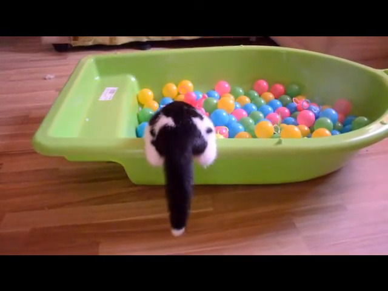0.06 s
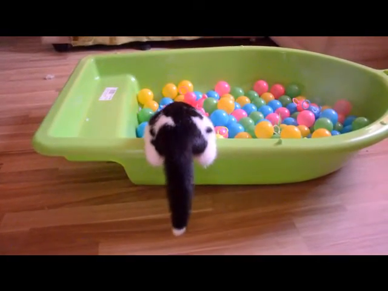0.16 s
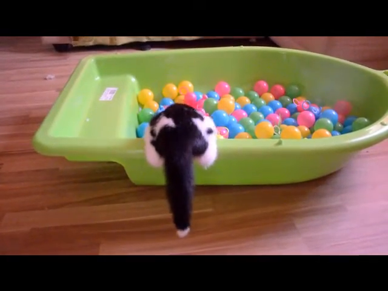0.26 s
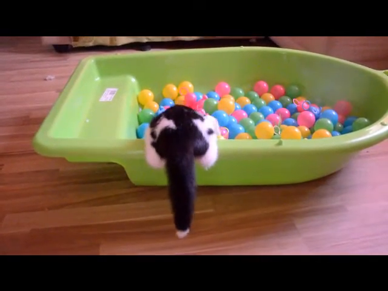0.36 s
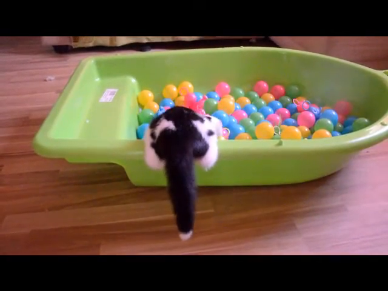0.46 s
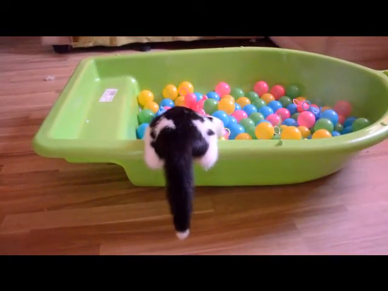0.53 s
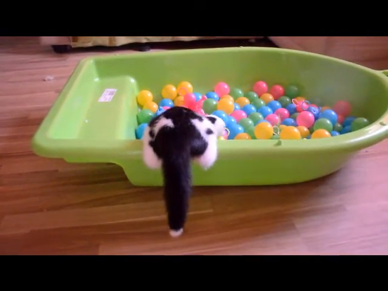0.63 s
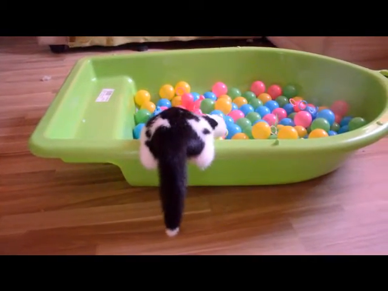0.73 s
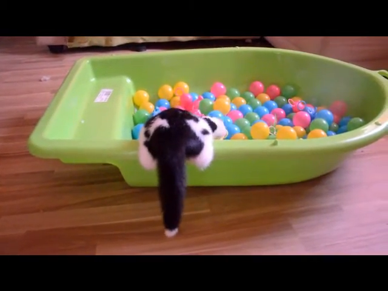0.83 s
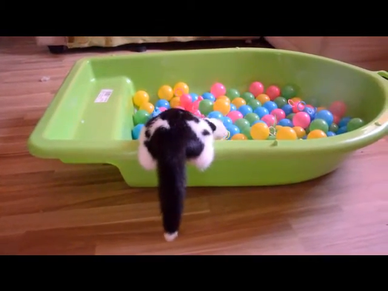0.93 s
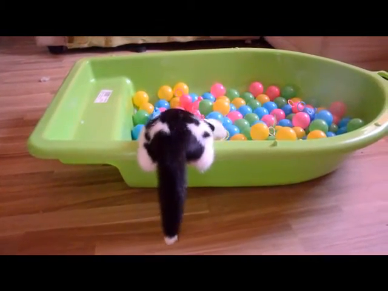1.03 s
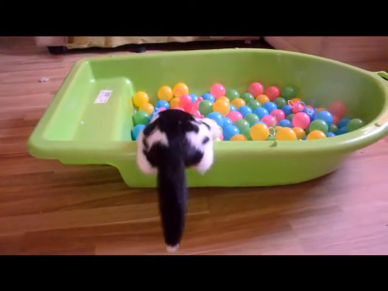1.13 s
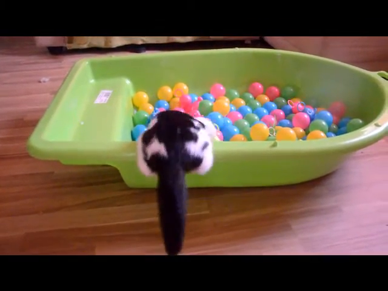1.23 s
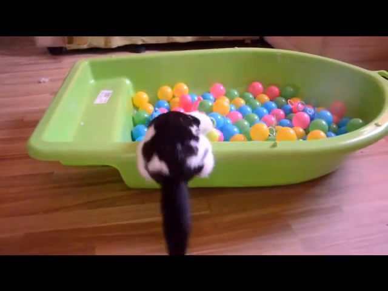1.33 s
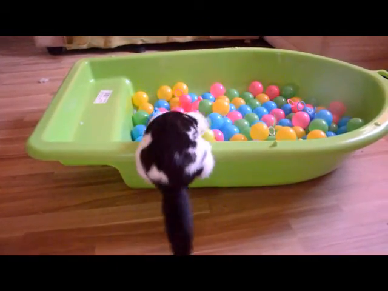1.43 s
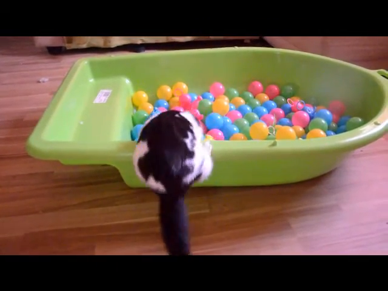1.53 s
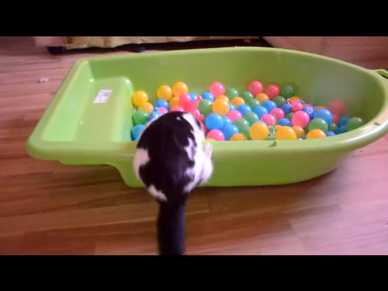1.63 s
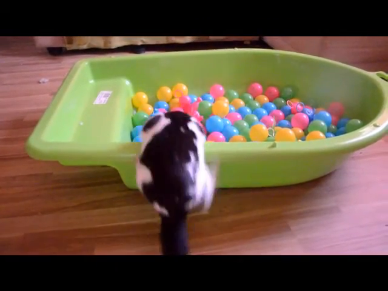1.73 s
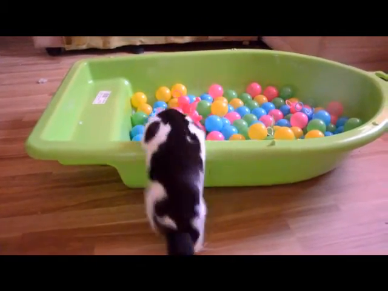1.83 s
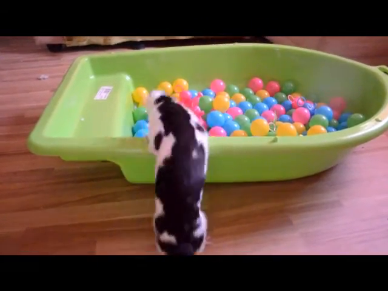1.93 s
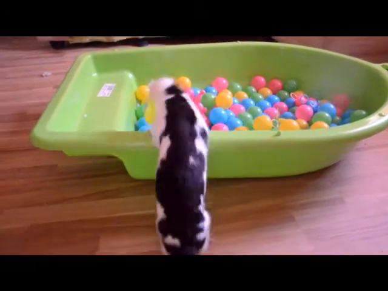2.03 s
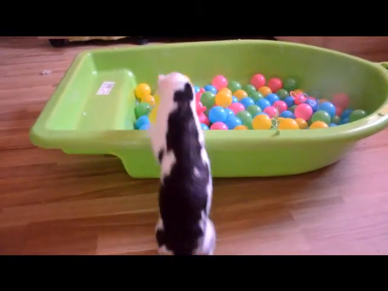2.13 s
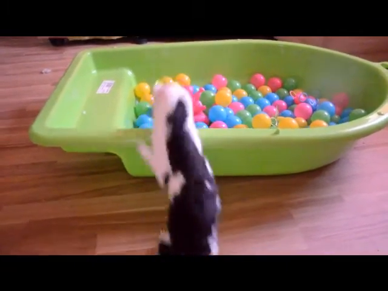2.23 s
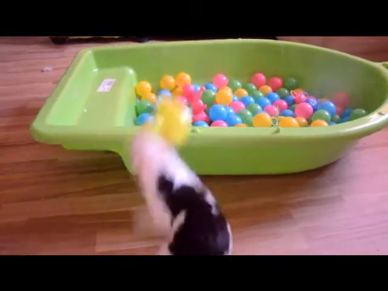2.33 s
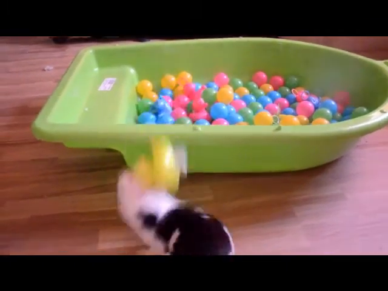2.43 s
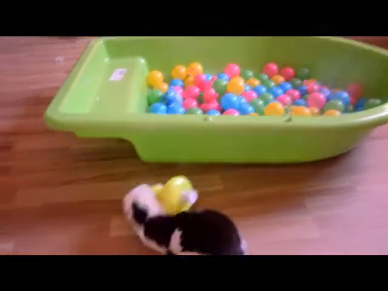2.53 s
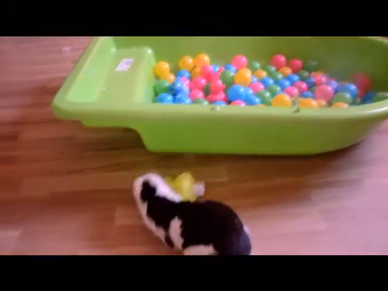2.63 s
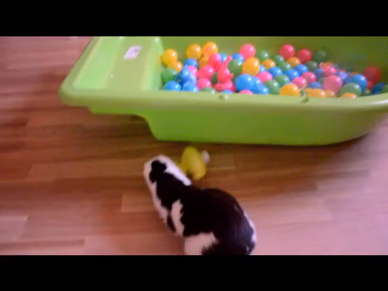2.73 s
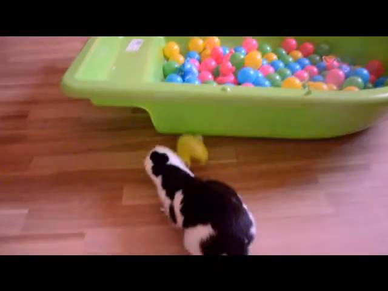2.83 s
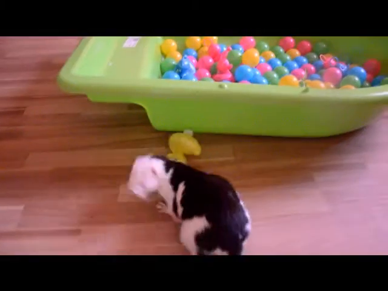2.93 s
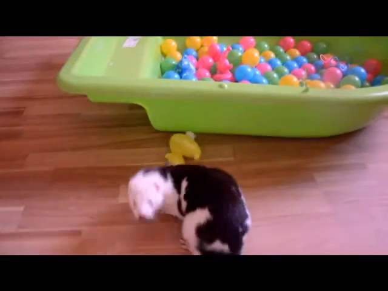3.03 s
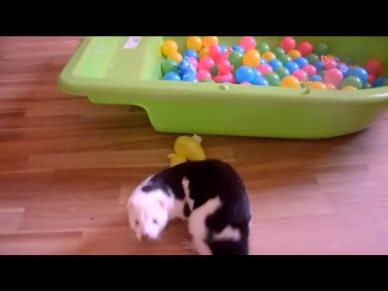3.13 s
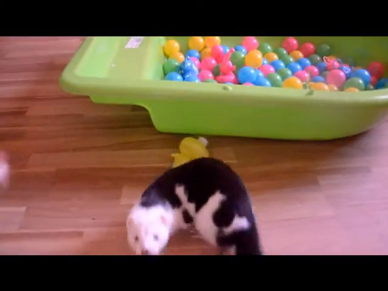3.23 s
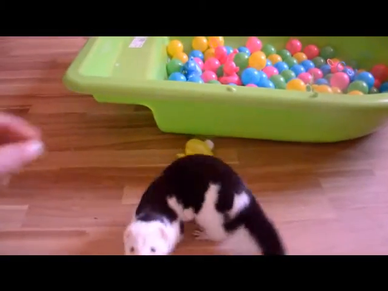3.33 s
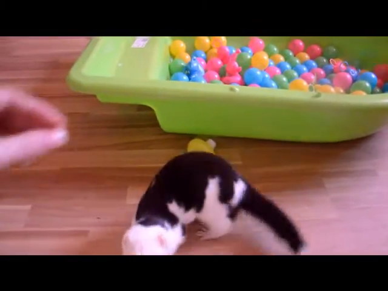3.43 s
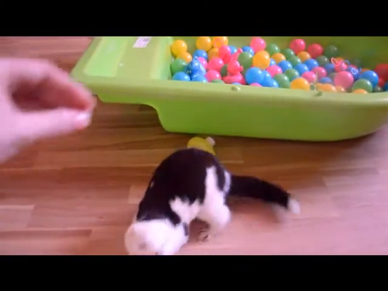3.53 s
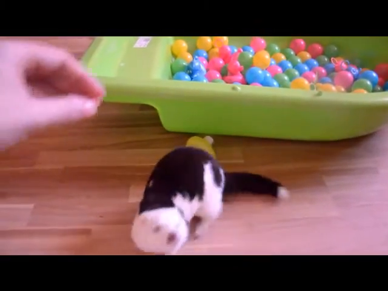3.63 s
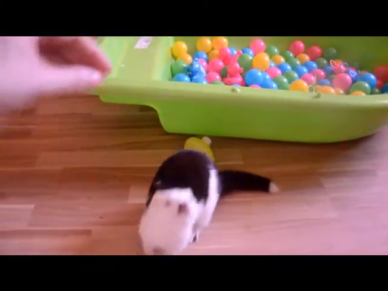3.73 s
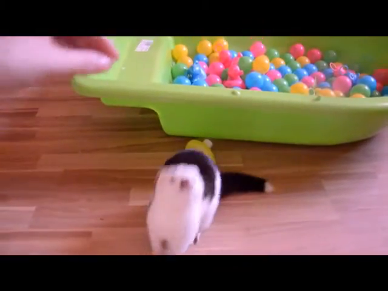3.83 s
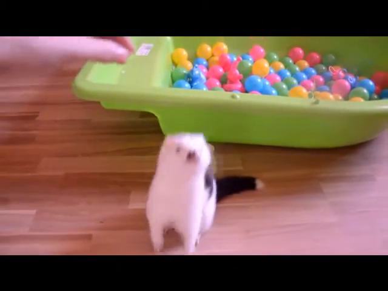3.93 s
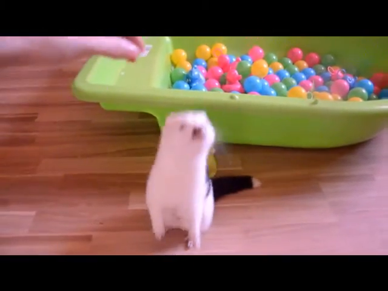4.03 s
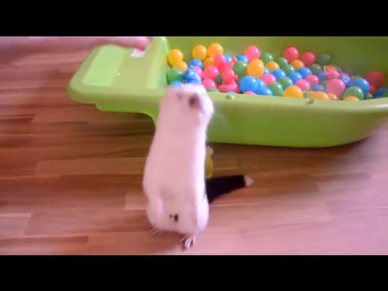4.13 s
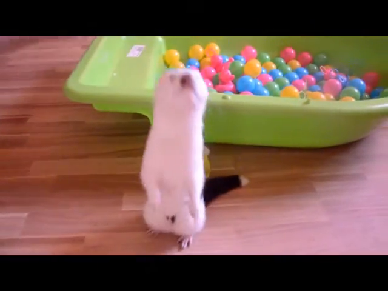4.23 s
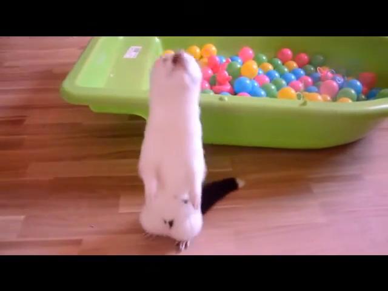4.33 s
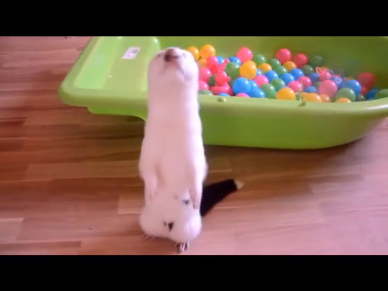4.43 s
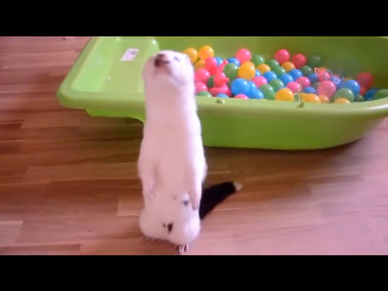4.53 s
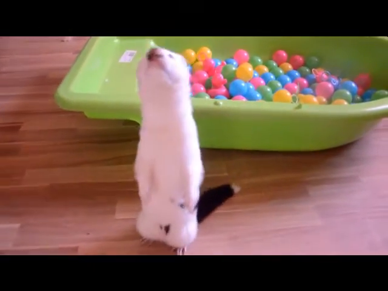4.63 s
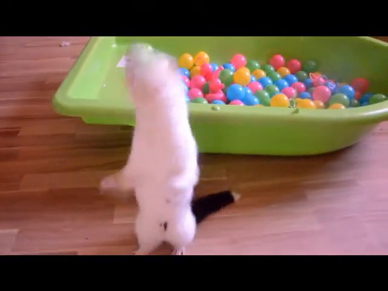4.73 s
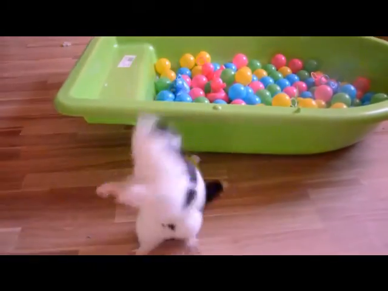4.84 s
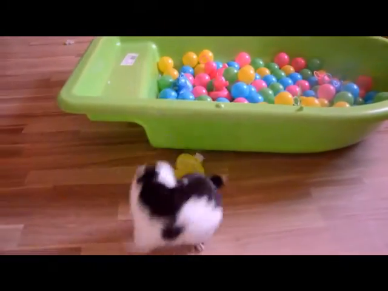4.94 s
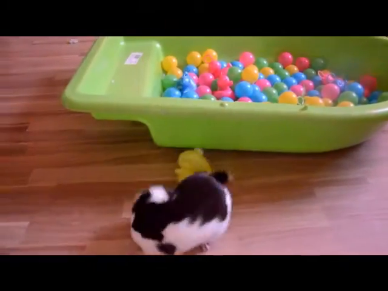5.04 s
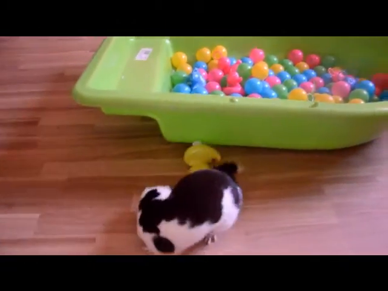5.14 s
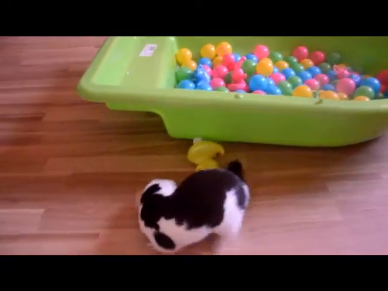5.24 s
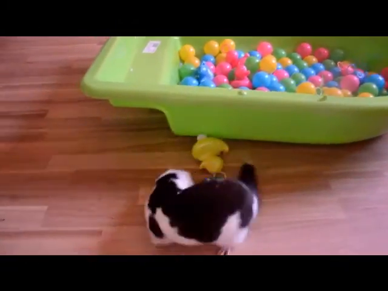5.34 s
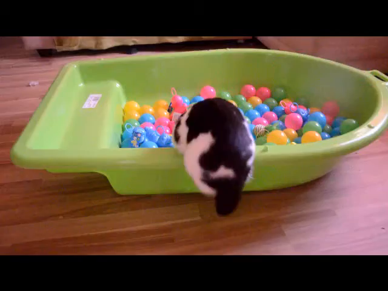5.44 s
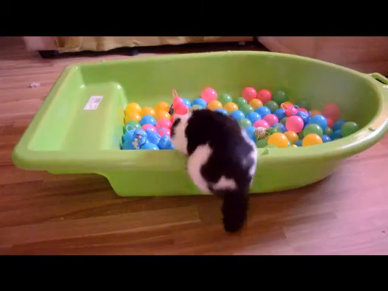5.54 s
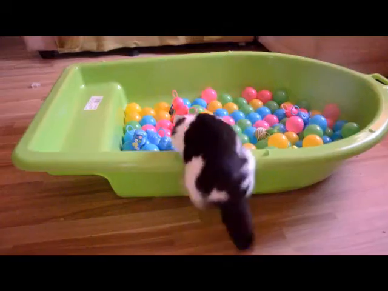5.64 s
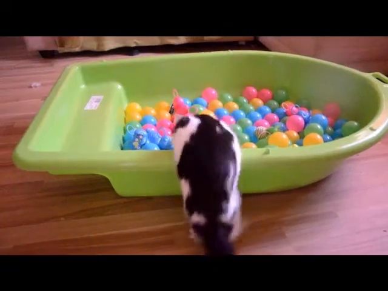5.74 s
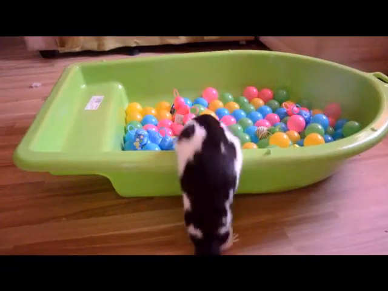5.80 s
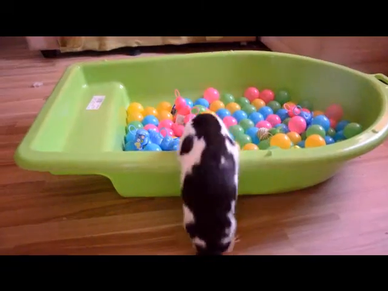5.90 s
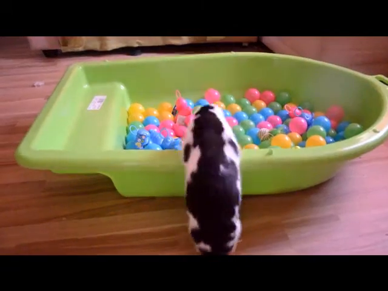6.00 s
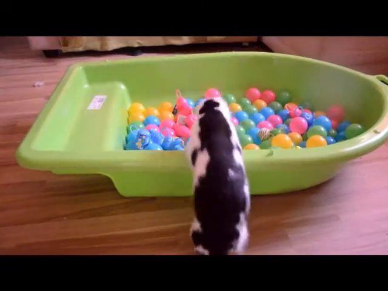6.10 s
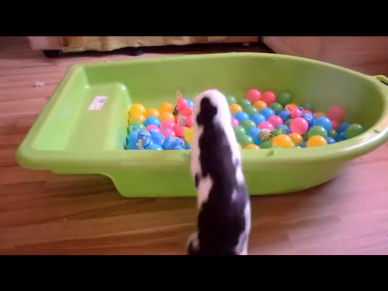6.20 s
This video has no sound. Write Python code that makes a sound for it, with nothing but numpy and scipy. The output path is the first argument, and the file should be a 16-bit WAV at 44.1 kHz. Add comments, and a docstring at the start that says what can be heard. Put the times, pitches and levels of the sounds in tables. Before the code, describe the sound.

A small animal roots among plastic balls, bumps the tub loudly, drops a bouncing toy on the floor, then digs in again.

```python
"""Hollow plastic balls rustle and knock over a faint appliance hum: a mink is rooting in a plastic baby tub.
The balls rub, squeak and hit the tub wall, and hard shoves rock the whole tub. The mink drags out a toy
that drops and bounces, making the laminate floor ring; the hardest blow overloads the microphone.
Toy and claws tick and paws scuff on the boards. The level dips briefly, then the mink digs into the balls
again while a faint high whistle sets in."""
import sys
import numpy as np
from scipy import signal
from scipy.fft import rfft, irfft, next_fast_len
from scipy.io import wavfile
from scipy.ndimage import uniform_filter1d

SR = 44100
rng = np.random.default_rng(int(sys.argv[2]) if len(sys.argv) > 2 else 0)


def master(y):
    """Save y as 16-bit WAV."""
    cut = np.clip(np.atleast_2d(y).T, -1, 1)
    pcm = np.round(cut * 32767)  # scale
    wavfile.write(sys.argv[1], SR, pcm.astype(np.int16))


N = 276374
TIME = np.arange(N) / SR
AGE = TIME[:SR // 2]   # seconds since a hit
BANDS_HZ = [(90, 550), (550, 1400), (1400, 4000), (4000, 14000)]   # thump, knock, clack, tick


def from_db(db):
    """Turn decibels into a gain."""
    return 10 ** (np.asarray(db) / 20)


def rms_one(x):
    """Scale a signal so that its average strength (rms) is 1."""
    return x / np.sqrt(np.mean(x ** 2) + 1e-20)


def at_level(sound, db):
    """Set the rms level of a sound's first 30 ms."""
    return from_db(db) * sound / np.sqrt(np.mean(sound[AGE < .03] ** 2))


def decay(t, t60):
    """A fade that falls by 60 dB in t60 seconds, the ring time."""
    return np.exp(-np.log(1000) * t / t60)


def add(out, s, sound):
    """Mix a sound in at s seconds."""
    start = int(np.clip(round(s * SR), 0, N - 1))
    out[start:start + len(sound)] += sound[:N - start]


def through(x, response):
    """Give a signal the ring or echoes of a response."""
    return signal.fftconvolve(x, response)[:len(x)]


def high_pass(x, hz):
    """Cut the lows: small or thin things give off little bass."""
    return signal.sosfilt(signal.butter(3, hz, "high", fs=SR, output="sos"), x)


def band_pass(x, edges_hz):
    """Keep what lies between two frequencies."""
    return signal.sosfilt(signal.butter(3, edges_hz, "band", fs=SR, output="sos"), x)


def pulse(spectrum, size=4096):
    """The shortest pulse with a given tone colour; its energy is 1."""
    hz, db = np.transpose(spectrum)
    grid_hz = np.maximum(np.fft.rfftfreq(size, 1 / SR), 1)
    gain = from_db(np.interp(np.log(grid_hz), np.log(hz), db))
    cepstrum = irfft(np.log(gain))
    cepstrum[1:size // 2] *= 2   # folding it in half packs the energy at the start
    cepstrum[size // 2:] = 0
    return rms_one(irfft(np.exp(rfft(cepstrum)))) / np.sqrt(size)


def narrow_noise(hz, width_hz):
    """Noise gathered around one pitch; its rms is 1."""
    size = next_fast_len(N, real=True)
    resonance = 1 / (1 + (2 * (np.fft.rfftfreq(size, 1 / SR) - hz) / width_hz) ** 2)
    return rms_one(irfft(rfft(rng.standard_normal(size)) * resonance, size)[:N])


def ring(tones, scatter_db=0, pitch=1, size=6000):
    """A struck object rings with its own tones; where it is hit can make each louder or softer."""
    hz, db, t60 = np.transpose(tones)[:, :, None]
    t = AGE[:size]
    strength = from_db(db + scatter_db * rng.uniform(-1, 1, hz.shape))
    sound = np.sum(strength * decay(t, t60) * np.sin(2 * np.pi * hz * pitch * t), axis=0)
    sound *= np.cos(np.pi / 2 * np.arange(size) / size)   # the ring fades smoothly to silence at its end
    return np.pad(rms_one(sound) / np.sqrt(size), (0, len(AGE) - size))


def reverb(t60_s=0.36, treble_t60_s=0.31, first_echo_s=0.0022, build_s=0.0084, lumpy_db=2.0):
    """The room's echoes build into a tail whose treble dies sooner; its energy is 1."""
    echoes = rng.standard_normal(len(AGE)) * from_db(lumpy_db * rng.uniform(-2.8, 2.2, len(AGE)))
    bass = signal.lfilter([.3], [1, -.7], echoes)
    tail = bass * decay(AGE, t60_s) + (echoes - bass) * decay(AGE, treble_t60_s)
    build_up = np.clip((AGE - first_echo_s) / build_s, 0, 1)
    return rms_one(tail * build_up) / np.sqrt(len(AGE))


def room(echo_db):
    """Direct sound and echoes from one spot in the room."""
    return (AGE == 0) + from_db(echo_db) * reverb()


def voiced(sound, levels_db, hard_hz=12000, db_per_octave=12.5):
    """How hard and where a blow lands sets the level of four bands; a soft blow is also duller."""
    _, _, clack_db, tick_db = levels_db
    dull_hz = np.clip(hard_hz * 2 ** ((tick_db - clack_db) / db_per_octave), 1800, 18000)
    sound = signal.sosfilt(signal.butter(2, dull_hz, fs=SR, output="sos"), sound)
    return sum(at_level(band_pass(sound, band), db) for band, db in zip(BANDS_HZ, levels_db))


def bouts(rows, rise_s, fall_s):
    """Gain of a repeated movement: each time it swells, holds and dies away."""
    gain = np.zeros(N)
    for s, length_s, db in rows:
        before, after = np.maximum(s - TIME, 0), np.maximum(TIME - s - length_s, 0)
        gain += from_db(db) * np.exp(-before / rise_s - after / fall_s)
    return gain


# tone colour of the room's air: f/Hz, relative level/dB
AIR_COLOUR = [(18, -53.5), (30, -14), (43, -4), (102, -2), (146, -5.5), (266, -3.5), (383, -8), (471, -1),
              (595, -4.5), (813, -7.5), (1400, -6), (1640, -9), (2130, -6.5), (3140, -11.5), (14900, -20)]
# the appliance's hum and whine: f/Hz, width/Hz, level/dB
HUM_TONES = [(59.2, 0.91, -80), (97.9, 3.3, -71.5), (473, 15, -85.5), (1265, 50, -72.5), (2087, 64, -67),
             (2150, 17, -71.5), (2725, 110, -71)]
def air_and_hum(air_db=-57.5):
    """The room's air hisses softly while an appliance hums and whines."""
    air = from_db(air_db) * through(rng.standard_normal(N), pulse(AIR_COLOUR))
    return air + sum(from_db(db) * narrow_noise(hz, width_hz) for hz, width_hz, db in HUM_TONES)


# tone colour of ball rubbing on ball: f/Hz, relative level/dB
RUB_COLOUR = [(59, -27.5), (100, -32), (279, 5.5), (523, -10), (829, -7), (1090, -7.5), (1550, -6),
              (1760, -7.5), (1960, -6.5), (5580, -21), (9820, -17.5), (13200, -34.5), (14900, -55.5)]
# the mink leans on the balls: t/s, length/s, level/dB
STIRS = [(0.0, 0.032, -59.5), (0.76, 0.15, -60.5), (0.98, 0.27, -56.5), (1.491, .48, -52.5),
         (2.359, .1, -56), (5.501, .28, -50.5), (5.88, 0.11, -57), (6.119, 0.095, -51.5)]
def rubbing(slips_per_s=900, uneven_db=5.0):
    """Tiny slips between leaning balls make a soft rustle."""
    sizes = from_db(uneven_db * np.clip(rng.standard_normal(N), -2, 2)) * rng.choice([-1, 1], N)
    slips = rms_one(sizes * (rng.random(N) < slips_per_s / SR))
    rustle = through(through(slips, pulse(RUB_COLOUR)), room(echo_db=6.5))
    return bouts(STIRS, rise_s=0.035, fall_s=0.069) * rms_one(rustle)


def settling(softer_db=10, spread_db=6.5, hard_db=-8, wall_db=3.5, fade_s=0.0075):
    """Once in each stir, at a random moment, a ball drops into a new place: one more small shove."""
    return [(s + length_s * rng.random(), db - softer_db + spread_db * rng.uniform(-1, 1),
             hard_db, wall_db, fade_s) for s, length_s, db in STIRS]


def jostle(fade_s, hits_per_s=420, soft_s=0.006, size=6000):
    """A shove runs through the heap as a fading string of hits; a quick one starts hard, a slow one swells."""
    t = AGE[:size]
    signs = rng.choice([-1, 1], size)
    push = np.exp(-t / fade_s) * (1 - np.exp(-3 * t / fade_s))
    hits = (rng.random(size) < hits_per_s / SR) * signs * push
    first_hit = rng.choice([-1, 1]) * 0.9 * np.exp(-fade_s / soft_s)
    hits[rng.integers(0, 60)] += first_hit
    return hits


# tone colour of plastic clicking on plastic or wood: f/Hz, relative level/dB
CLICK_COLOUR = [(100, 4.5), (1000, -3.5), (3000, -4.5), (5200, -3.5), (7200, -5.5), (9600, -2),
                (11500, -9.5), (13000, -16), (14500, -26)]
# tones of one ball's shell: f/Hz, relative level/dB, ring time/s
BALL_TONES = [(1083, -7.5, 0.065), (1474, -1.5, 0.021), (1844, 6.5, 0.016), (2630, 15, 0.0038),
              (3533, 0, 0.014), (4990, -10, 0.013), (10290, -9.5, 0.014)]
# tones of the tub wall: f/Hz, relative level/dB, ring time/s
WALL_TONES = [(132, -1, 0.089), (201, -25.5, .14), (228, -3.5, 0.34), (271, -1.5, 0.069),
              (298.3, -8, 0.068), (329.4, 12, 0.034), (400, 0, 0.11), (451.6, 0, 0.07), (498, -5, 0.046),
              (610, -11, 0.044), (741, -1, 0.033), (840, -13, 0.0774), (890, 2.5, 0.015), (996, -2, 0.077),
              (1184, -5, 0.019)]
# shoves among the balls: t/s, knock level/dB, hardness (tick over knock)/dB,
# tub wall (thump over knock)/dB, fade time/s
SHOVES = [(0.004, -52.5, -22.5, 5.5, 0.0079), (0.243, -62, -6, 4, 0.053), (0.734, -59.5, -29, 7, .015),
          (0.851, -50, -20, -4.5, 0.0036), (0.984, -50.5, -8, 2, 0.0058), (1.008, -51.5, -5.5, 1.5, 0.0056),
          (1.144, -52.5, -4, 3.5, 0.02), (1.209, -63.5, 14, 13.5, 0.0023), (1.364, -45.5, -11, 0, 0.011),
          (1.38, -46, -5.5, 8, 0.0075), (1.402, -38, -22, -7.5, 0.0026), (1.503, -54.5, -4, -12, .004),
          (1.543, -51.5, -9, 7, 0.0055), (1.568, -47, -11, 0.5, .0055), (1.6706, -43.5, 8.5, -8, 0.0018),
          (1.692, -37, -8, -8.5, 0.0075), (1.712, -46, 5.5, -2.5, .004), (1.733, -40, 2.5, -19, 0.0037),
          (1.843, -52.5, -11, 3, 0.0035), (1.912, -48, -28, -4, .018), (1.940, -32, -24, -8, .011),
          (1.997, -35.5, -16.5, -9.5, 0.0029), (2.1063, -24, -4.5, -2.5, .0036),
          (2.286, -47.5, -9, -12, .002), (2.358, -47, -5.5, 0.5, .004), (2.406, -51.5, -1, -9, 0.01),
          (5.534, -49.5, -6, -2.5, 0.014), (5.552, -41.5, -0.5, -16, 0.0086), (5.611, -34, -10, -9, .0075),
          (5.717, -50.5, -10, 2.5, .003), (5.802, -48.5, 5, -22, 0.012), (5.910, -46.5, -28, -8, .011),
          (5.946, -53.5, 2, -4, .002), (5.965, -59, -6, 0, 0.009), (6.108, -41, -30, -13, .007),
          (6.255, -40.5, -10, 7.5, 0.0064)]
def balls(wall_mix_db=1.0, click_mix_db=2.0, size_spread=.15, count=4, size=4096):
    """Each shove knocks a few balls of different sizes together and against the tub wall."""
    out, click = np.zeros(N), pulse(CLICK_COLOUR, size=len(AGE))
    places = np.array([room(echo_db=0) for _ in range(count ** 2)])   # each spot has its own echoes
    for s, db, hard_db, wall_db, fade_s in SHOVES + settling():
        heap = 0
        for echoes in rng.choice(places, count, replace=False):
            pitch = np.exp(size_spread * rng.uniform(-1, 1))
            shell = ring(BALL_TONES, scatter_db=4, pitch=pitch, size=1500)
            wall = ring(WALL_TONES, scatter_db=5, size=3500)
            contact = shell + from_db(wall_mix_db) * wall + from_db(click_mix_db) * click
            heap = heap + through(echoes, signal.fftconvolve(jostle(fade_s), contact[:size]))
        levels_db = db + np.array([wall_db, 0, 1 + 0.4 * hard_db, hard_db])   # harder is brighter
        add(out, s, voiced(high_pass(heap, hz=180), levels_db))
    return out


# tones of the tub rocking on its base: f/Hz, relative level/dB, ring time/s
BASE_TONES = [(55, -12, 0.084), (87.6, -17, .16), (119.6, -4, 0.16), (206, -8, 0.65), (255.6, 9, 0.21),
              (323, -18, 0.2), (396, -17, 0.32), (425, 12, 0.078), (670, -12, 0.067), (883, 11.5, .05),
              (950, -9.5, 0.017)]
# the tub bumps against the floor: t/s, level/dB
JOLTS = [(1.402, -46.5), (1.945, -43.5), (2.091, -58), (2.106, -19.5), (6.255, -34.5)]
def tub_jolts():
    """A hard blow rocks the whole tub with a deep, hollow thud."""
    out = np.zeros(N)
    for s, db in JOLTS:
        add(out, s, at_level(through(ring(BASE_TONES), room(echo_db=-7)), db))
    return high_pass(out, hz=65)


# plastic squeaking on plastic: t/s, f/Hz, relative level/dB, length/s, wobble/share of the pitch
SQUEAKS = [(1.506, 2340, -39.5, 0.0056, 0.069), (1.519, 2665, -41.5, 0.014, 0.2),
           (2.405, 1980, -40.5, 0.0032, 0.06), (2.449, 2130, -43.5, 0.005, 0.071),
           (5.473, 1400, -49.5, 0.025, 0.089), (5.942, 4137, -43.5, 0.02, 0.3),
           (5.958, 3900, -48.5, 0.02, 0.3)]
def squeaks():
    """Plastic sticks and slips fast enough to give a short, unsteady pitch."""
    out = np.zeros(N)
    for s, hz, db, length_s, wobble in SQUEAKS:
        drift = rms_one(uniform_filter1d(rng.standard_normal(len(AGE)), size=24))
        pitch_hz = hz * (1 + wobble * drift)
        swell = np.sin(np.pi * np.clip(AGE / length_s, 0, 1))
        tone = np.sin(2 * np.pi * np.cumsum(pitch_hz) / SR)
        add(out, s, through(2 * from_db(db) * swell * tone, room(echo_db=-3.5)))
    return out


def crack(fade_s, echo_db):
    """Two hard surfaces chatter briefly as they meet; the room returns an even wash."""
    burst = rms_one(rng.standard_normal(len(AGE)) * np.exp(-AGE / fade_s)) / np.sqrt(len(AGE))
    return through(burst + from_db(echo_db) * reverb(), pulse(CLICK_COLOUR, size=512))


# tones of the laminate boards: f/Hz, relative level/dB, ring time/s
BOARD_TONES = [(205, -7, 0.2), (276, -1, 0.063), (326.7, 10, 0.013), (357, -16, 0.23),
               (412.6, -15.5, 0.098), (460.4, -17.5, 0.13), (680, -12, 0.043), (775, -5, 0.024),
               (898, -0.5, 0.018), (1400, -13, 0.02), (1636, -9, 0.033), (1950, 3, 0.013),
               (2185, -4.5, 0.03), (2500, -22.5, 0.045)]
# toy and paws hit the floor: t/s, thump level/dB, hardness/dB, f/Hz that the struck spot favours
FLOOR_BLOWS = [(2.5772, -16.5, 4.5, 288), (2.6192, -36, 7, 297), (2.6229, -21, 1, 295),
               (2.7141, -19.5, -3.5, 280), (2.7766, -22, -4, 275), (2.8233, -23, -4, 266),
               (2.8648, -22.5, 5.5, 340), (2.938, -40.5, 2.5, 312), (2.968, -42, 0.5, 306),
               (3.195, -46.5, -7, 294), (3.2268, -27.5, -1, 388), (3.429, -46.5, -2, 292),
               (3.807, -59, -1.5, 404), (4.698, -51.5, 1.5, 205), (4.802, -43.5, 1.5, 205),
               (4.928, -46, 3, 400), (5.033, -40.5, 2, 350), (5.303, -42.5, -5.5, 275),
               (6.0728, -37.5, -6, 270)]
def floor_blows(favour_db=11.0, favour_width=0.12, slap_s=0.015, slap_db=-11.0, absorb_s=0.44,
                echo_db=-2.5, crack_db=-11.5):
    """Toy and paws set the boards ringing under a short crack; each spot favours some tones."""
    out = np.zeros(N)
    hz, db, t60 = np.transpose(BOARD_TONES)
    for s, thump_db, hard_db, spot_hz in FLOOR_BLOWS:
        lift_db = favour_db * np.exp(-(np.log(hz / spot_hz) / favour_width) ** 2)
        boards = ring(np.column_stack([hz, db + lift_db, t60]))
        # a near wall returns one clear echo; the wash of other echoes dies quickly along the floor
        slap = from_db(slap_db) * np.interp(AGE - slap_s, AGE, boards, left=0)
        wash = high_pass(through(boards, reverb() * np.exp(-AGE / absorb_s)), hz=280)
        body = high_pass(boards + from_db(echo_db) * (slap + wash), hz=218)
        contact = high_pass(from_db(crack_db) * crack(fade_s=0.0034, echo_db=-1), hz=800)
        # hardness lifts the three bands above the thump
        levels_db = thump_db + np.array([0, hard_db - 7, hard_db - 13, hard_db - 18.5])
        add(out, s, voiced(body + contact, levels_db, hard_hz=16100))
    return out


def floor_thuds(hz=72, t60_s=0.045, offset_db=-12.0, growth=1.15):
    """The same blows bend the whole floor: a deep thud that grows faster than the thump."""
    out = np.zeros(N)
    flex = decay(AGE, t60_s) * np.sin(2 * np.pi * hz * AGE)
    for s, thump_db, _, _ in FLOOR_BLOWS:
        add(out, s, from_db(offset_db + growth * thump_db) * flex)
    return high_pass(out, hz=24)


# tones of a small hard tip, such as a claw: f/Hz, relative level/dB, ring time/s
TIP_TONES = [(2830, 2.5, 0.015), (4130, 6.5, 0.006), (5430, -13, 0.0023), (9800, 3, 0.0044)]
# light ticks on the boards from the bouncing toy and from claws: t/s, length/s, relative level/dB
TICK_RUNS = [(2.755, .01, -32), (3.02, .17, -39), (3.272, .01, -51), (3.785, .01, -47), (4.678, .01, -42.5),
             (4.99, .05, -41), (5.203, .01, -49)]
def light_ticks(gap_s=0.023, uneven=0.45, ring_db=-17.5, scratch_db=-17.5, count=12):
    """The toy or a claw taps the hard floor and rings briefly, once or in an uneven run."""
    out, ticks = np.zeros(N), []
    for _ in range(count):
        tip = through(ring(TIP_TONES, scatter_db=3, size=1500), room(echo_db=2))
        scratch = crack(fade_s=0.003, echo_db=-6.5)
        ticks.append(at_level(tip, ring_db) + at_level(scratch, scratch_db))
    for start_s, length_s, db in TICK_RUNS:
        s = start_s
        for tick in rng.permutation(ticks):
            if s <= start_s + length_s:
                add(out, s, from_db(db) * tick)
            s += gap_s * (1 + uneven * rng.uniform(-1, 1))
    return high_pass(out, hz=2500)


# paws and fur slide over the boards: t/s, length/s, drone level/dB
SLIDES = [(4.3, 0.57, -64), (4.93, .08, -47.5), (5.02, 0.13, -46.5)]
def scuff(grain_db=11.0, hiss_db=-7.5):
    """Sliding paws hiss, and their rubbing makes the boards drone."""
    friction = rng.standard_normal(N) * from_db(grain_db * rng.uniform(-2, 2, N))
    drone = band_pass(through(friction, ring(BOARD_TONES)), edges_hz=(280, 800))
    hiss = high_pass(through(friction, pulse(CLICK_COLOUR)), hz=700)
    sliding = rms_one(drone) + from_db(hiss_db) * rms_one(hiss)
    return bouts(SLIDES, rise_s=0.031, fall_s=0.052) * sliding


def paw_judder(peak_s=5.12, swell_s=0.028, db=-35.5, hz=280, sag_hz_per_s=170, wobble=0.035):
    """A dragged paw sticks and slips in step with the boards: a short groan that sinks as it slows."""
    since = TIME - peak_s
    drift = rms_one(uniform_filter1d(rng.standard_normal(N), size=200))
    pitch_hz = (hz - sag_hz_per_s * since) * (1 + wobble * drift)
    swell = np.exp(-(since / swell_s) ** 2)
    return from_db(db) * swell * np.sqrt(2) * np.sin(2 * np.pi * np.cumsum(pitch_hz) / SR)


# brief dips in the whole sound: t/s, length/s, level change/dB
DIPS = [(5.379, 0.107, -11.5), (5.389, 0.027, -19.5)]
def dips(edge_s=0.0052):
    """A gain that dips briefly; where dips overlap, their depths add."""
    change_db = np.zeros(N)
    for s, length_s, db in DIPS:
        inside_s = np.minimum(TIME - s, s + length_s - TIME)
        change_db += db * np.clip(inside_s / edge_s, 0, 1)
    return from_db(change_db)


def whistle(times_s=(5.45, 5.6, 6.27), levels_db=(-100, -65, -63)):
    """A faint, breathy high whistle sets in near the end."""
    return from_db(np.interp(TIME, times_s, levels_db)) * narrow_noise(hz=6350, width_hz=800)


def scene():
    """The room, the tub and the floor, heard from one point."""
    background = air_and_hum()
    tub = rubbing() + balls() + tub_jolts() + squeaks()
    floor = floor_blows() + floor_thuds() + light_ticks() + scuff() + paw_judder()
    return (dips() * (background + tub + floor + whistle()))[None]


def record(dry):
    """The overloaded microphone flattens the tallest peaks; the highest treble is cut."""
    overload, cutoff_hz = 0.69, 14600
    treble_cut = signal.ellip(10, .1, 80, cutoff_hz, fs=SR, output="sos")
    return signal.sosfilt(treble_cut, np.clip(dry, -overload, overload))


dry = scene()
out = record(dry)
master(out)
```